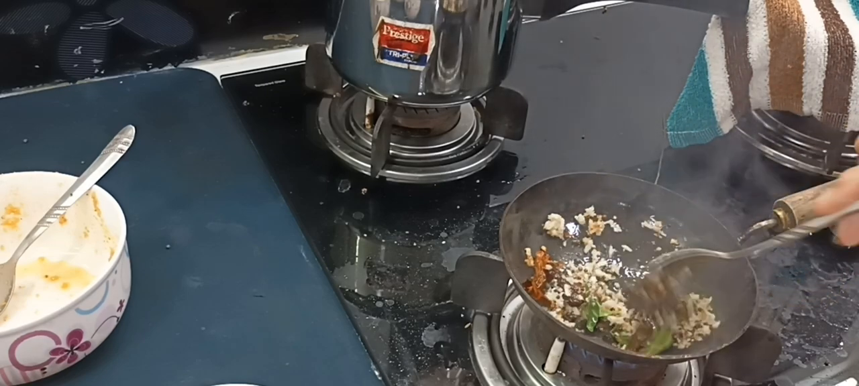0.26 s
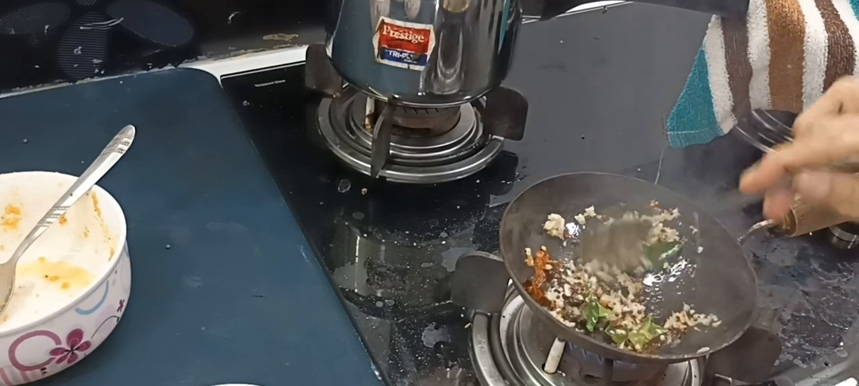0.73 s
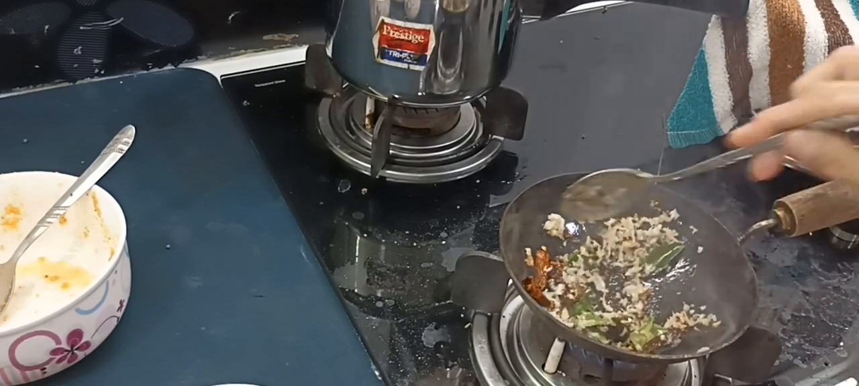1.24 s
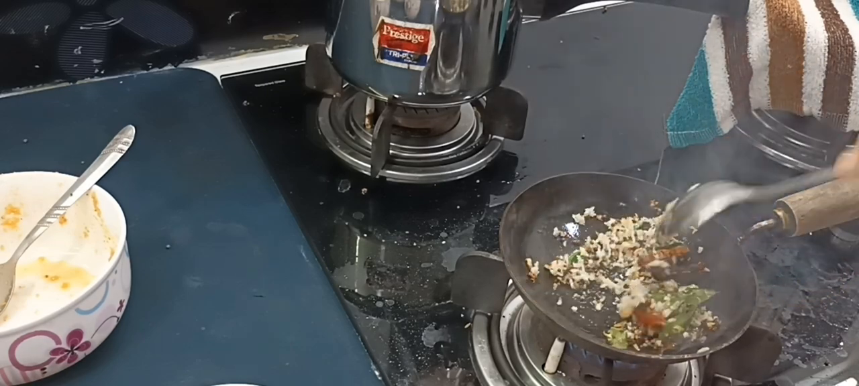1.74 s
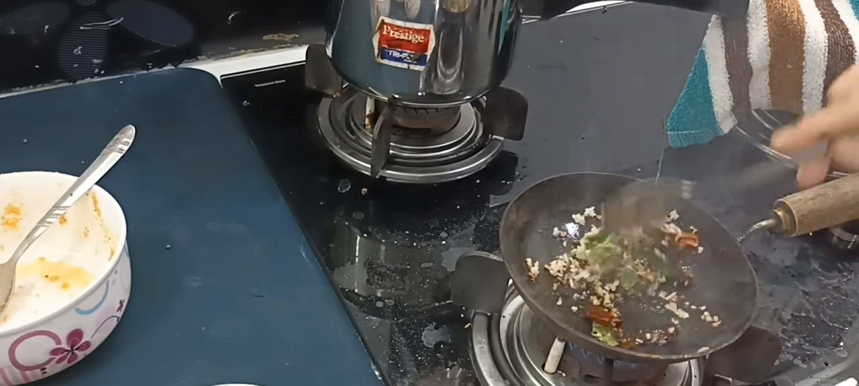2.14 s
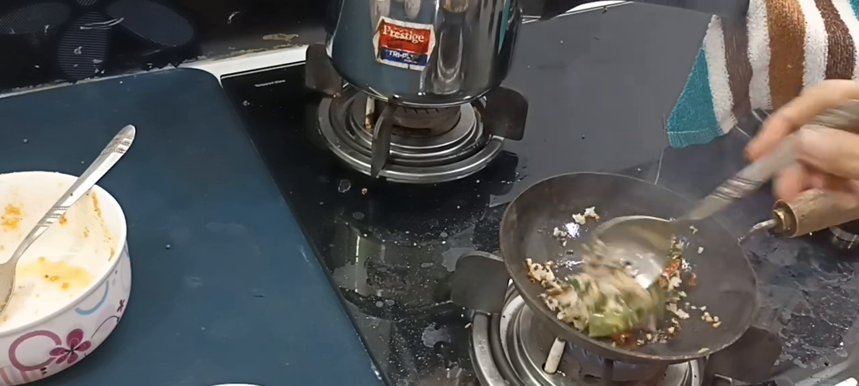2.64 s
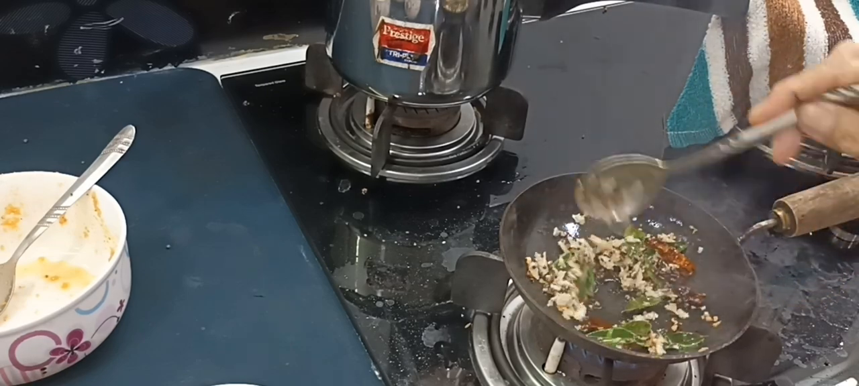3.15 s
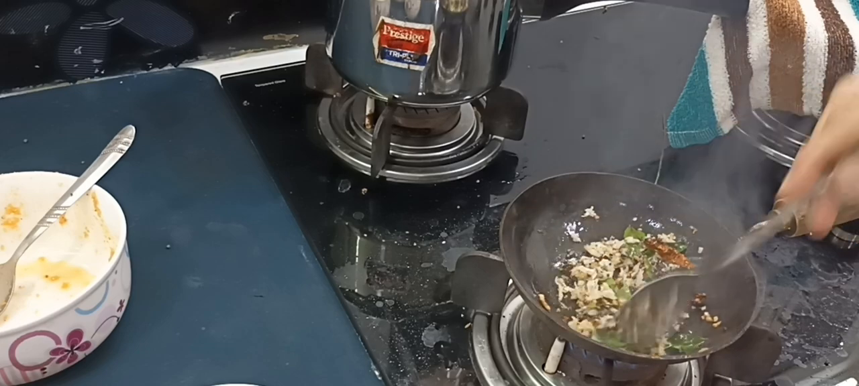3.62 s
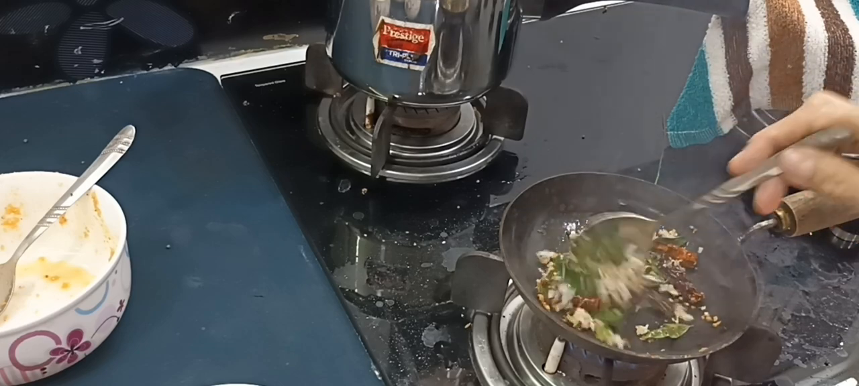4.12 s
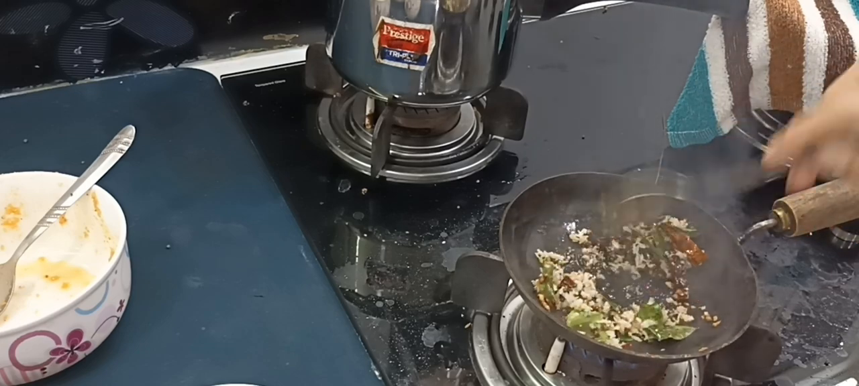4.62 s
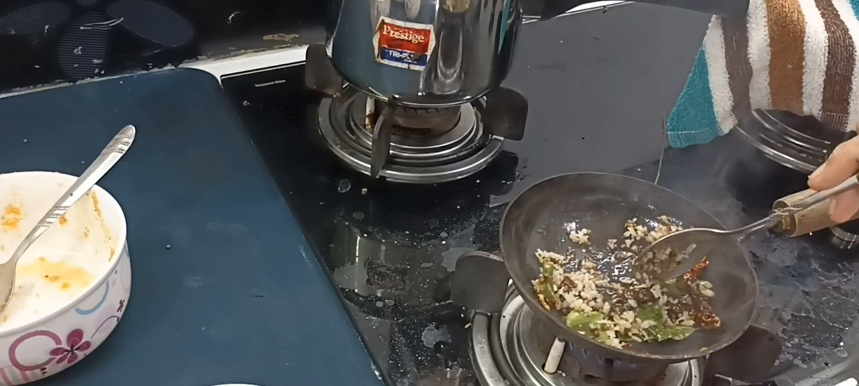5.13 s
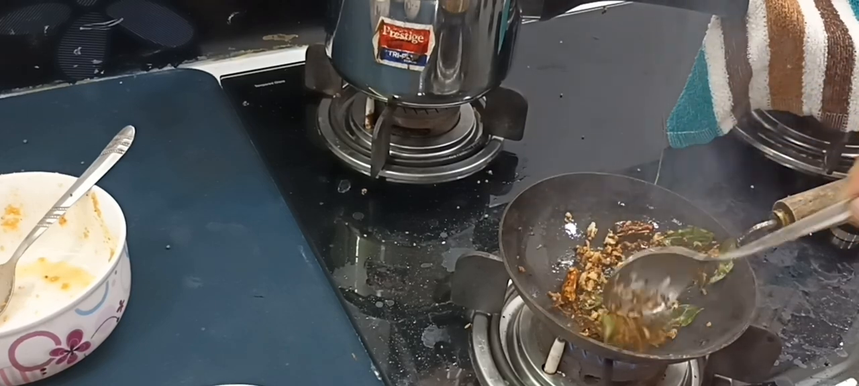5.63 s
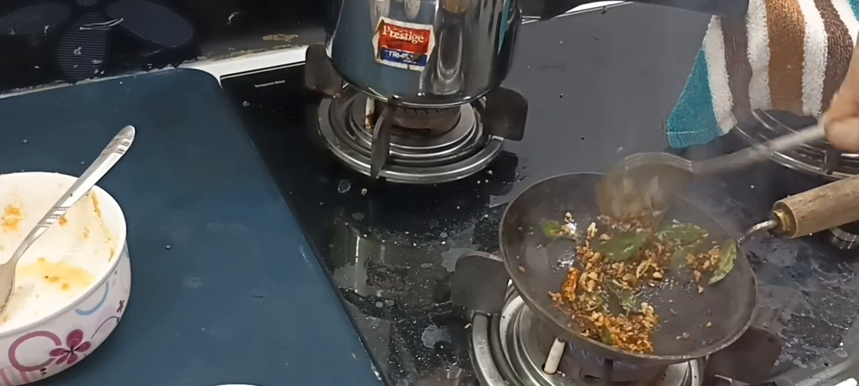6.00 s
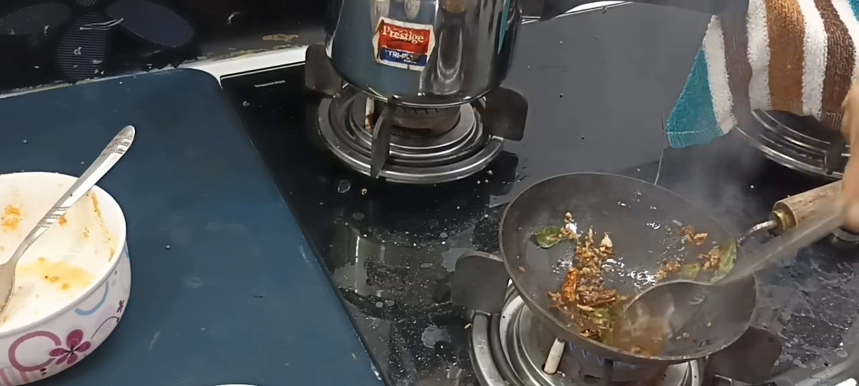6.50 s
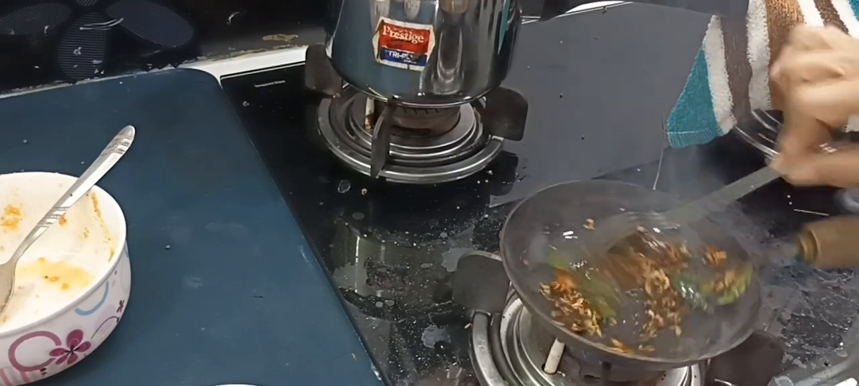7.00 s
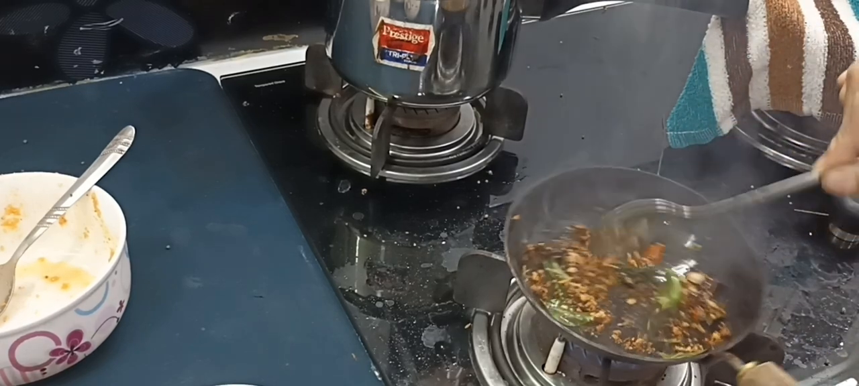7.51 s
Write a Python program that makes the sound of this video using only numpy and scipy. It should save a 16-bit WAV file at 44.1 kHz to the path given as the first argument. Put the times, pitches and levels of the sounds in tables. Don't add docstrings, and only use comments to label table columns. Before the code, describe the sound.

A phone close to the stove picks up bright, brittle popping and fine treble sizzle over a faint low room hum. A ringing spoon tap comes at the start, with more clinks mid-way and short gritty scrapes. Low wobbling thuds of the pan grow busier. Heavy pops flare into hiss and briefly duck the background; near the end the iron pan is dragged, grinding and shuddering, and the spoon strikes loudly. Pops sit mostly left.

```python
import sys
import numpy as np
from scipy import signal
from scipy.fft import rfft, irfft
from scipy.io import wavfile
from scipy.ndimage import uniform_filter1d

SR = 44100
rng = np.random.default_rng(int(sys.argv[2]) if len(sys.argv) > 2 else 0)


def generate_wav(sig):
    pcm = np.round(np.clip(np.atleast_2d(sig).T, -1, 1) * 32767).astype(np.int16)
    wavfile.write(sys.argv[1], SR, pcm)


def magnitude_from_level(level_db):
    exponent = np.asarray(level_db, float) / 20
    return 10 ** exponent


N = 341951

PAN_HZ = [290, 378, 458, 560, 640, 974, 1190, 1324, 1394, 1653, 2044, 2500, 3050, 3430, 4430]
# level_db, t60_s
PAN_MODES = [(-41, 0.092), (4.5, 0.27), (11.5, 0.14), (-7, 0.009), (1, 0.16), (-14, 0.21), (2.5, 0.11),
             (-1.5, 0.07), (1.5, 0.046), (2.5, 0.36), (3, 0.18), (-11.5, 0.45), (-1.5, 0.32), (-9, 0.22),
             (5, 0.0095)]
# start_s, peak_db, pitch_hz, iron_rattle_db (re peak)
ROCKS = [(0.079, -35.5, 145.6, -6.5), (0.145, -42.5, 143.3, -11), (0.43, -48.5, 142, -13),
         (0.69, -46.5, 144, -19), (0.924, -49, 134.3, 1), (3.44, -49, 139, -17), (3.51, -47.5, 143.4, -9),
         (4.67, -44, 136.4, -16), (0.346, -43.5, 146, -17), (0.648, -43.5, 141.4, -18),
         (1.06, -40, 145.6, -8), (1.264, -44, 133, -1.5), (1.431, -45, 137, 6), (1.885, -33, 141.7, -5.5),
         (1.996, -42.5, 140.3, -17), (2.25, -33.5, 138.3, -10.5), (2.993, -35.5, 145.3, -9),
         (3.237, -29.5, 140.8, -13), (3.6, -34.5, 146.3, -8), (3.675, -35, 141, -22),
         (3.929, -36, 138, 0.5), (4.357, -31, 143, -11), (4.59, -37.5, 141.4, -5), (5.554, -44, 148, -11),
         (5.728, -31.5, 147.4, -13), (6.057, -40, 168, -4), (6.488, -45, 145, -9.5),
         (6.623, -40.5, 146, -13), (6.91, -31.5, 147, -44), (7.111, -28.5, 144.6, -10),
         (7.248, -31.5, 157.6, -22), (7.363, -32, 139.5, -34), (7.484, -30, 145, -21),
         (7.585, -25, 147, -13), (7.676, -32.5, 141, -4.5)]
# frequency_hz, density_db
OIL = [(300, -21), (1500, -11.5), (3000, -3), (6000, 10.5), (7800, 8.5), (8900, 10.5), (11300, 10.5),
       (12300, 9.5), (14000, 8), (16500, 1)]
# frequency_hz, density_db
FIZZ = [(400, -30), (1200, -11), (2500, 0), (5500, 0), (7500, -12), (12000, -30)]
# frequency_hz, density_db
IRON = [(70, -29.5), (120, -2.5), (250, -5.5), (600, -0.5), (1500, -11.5), (4700, -11), (6500, -49.5)]


def curve(table):
    s, *columns = np.transpose(table)
    return [np.interp(np.arange(N) / SR, s, column) for column in columns]


def unit(x):
    return x / np.sqrt(np.mean(x ** 2))


def colour(x, points):
    hz, db = np.transpose(points)
    grid_hz = np.linspace(1, SR / 2, 2049)
    gain_db = np.interp(np.log(grid_hz), np.log(hz), db)
    cepstrum = irfft(np.log(magnitude_from_level(gain_db)))
    cepstrum[1:2048] *= 2
    cepstrum[2049:] = 0
    h = irfft(np.exp(rfft(cepstrum)))[None, :2048]
    return signal.oaconvolve(x, h / np.sqrt(np.sum(h ** 2)), axes=1)[:, :N]


def ring(x, hz, t60):
    r = np.exp(-np.log(1000) / t60 / SR)
    return signal.lfilter([.5, 0, -.5], [1, -2 * r * np.cos(2 * np.pi * hz / SR), r * r], x)


def noise(shared):
    share = np.clip(shared, 0, 1)
    common, own = rng.standard_normal(N), rng.standard_normal((2, N))
    return np.sqrt(share) * common + np.sqrt(1 - share) * own


def walk(rate):
    hold = int(SR / rate)
    levels = rng.standard_normal(N // hold + 1)
    return uniform_filter1d(np.repeat(levels, hold), hold)[:N]


def add(out, s, sound):
    i = int(s * SR)
    out[..., i:i + sound.shape[-1]] += sound[..., :N - i]


def low_pass(x, hz):
    return signal.sosfilt(signal.ellip(10, .3, 60, hz, fs=SR, output="sos"), x)


def kitchen(level_db=-52.5):
    # frequency_hz, density_db
    room_spectrum = [(15, -26), (25, -3.5), (126, 4), (188, 0), (314, 1.5), (575, -18.5), (2000, -18),
                     (2600, -71), (4400, -120)]
    return magnitude_from_level(level_db) * unit(colour(noise(0.68), room_spectrum))


def sizzle(wake_db, grain_db=4, sparse=.05, grain_share_db=-4):
    # start_s, sizzle_db, fizz_db (re sizzle)
    simmer = [(0.0, -30.5, -12), (0.32, -33.5, -8), (1.21, -40, -8.5), (1.6, -42, -4), (2.46, -36, -13.5),
              (2.72, -41, -9.5), (3.15, -43.5, -9.5), (3.37, -43, -15), (3.65, -45.5, -8.5),
              (4.42, -37, -11.5), (5.14, -43.5, -11.5), (5.37, -43, -5), (5.63, -48, -9.5), (6.0, -49, 7),
              (6.3, -30, -9), (6.6, -42, -10.5), (7.1, -35.5, -34), (7.75, -51, -13)]
    level_db, fizz_db = curve(simmer)
    size_db = grain_db * np.minimum(rng.exponential(size=N), 2.2)
    bubbles = (rng.random(N) < sparse) * magnitude_from_level(size_db) * rng.standard_normal(N)
    grains = magnitude_from_level(grain_share_db) * unit(bubbles)
    steam = (noise(.15) + grains) * magnitude_from_level(1.8 * walk(150) + 1.3 * walk(25))
    fizz = (noise(0.023) + grains) * magnitude_from_level(fizz_db + 1.5 * walk(40) + 2.4 * walk(25))
    return magnitude_from_level(level_db + wake_db - 10.0) * (colour(steam, OIL) + colour(fizz, FIZZ))


def pan(modes_db=-1.0, knock_s=0.042, stand_db=7.0, muffle_db=1.0, bright_db=-5, stir_level_db=-56.5):
    # start_s, grind_db
    drag = [
        (6.72, -90),
        (6.735, -36.5),
        (6.808, -46),
        (6.818, -32),
        (6.9, -37),
        (7.13, -28.5),
        (7.4, -30),
        (7.55, -32),
        (7.75, -43),
    ]
    jolts, t = np.zeros(N), np.arange(SR // 4) / SR
    for s, db, _, knock_db in ROCKS:
        add(jolts, s, magnitude_from_level(db + knock_db) * np.exp(-t / knock_s))

    time = np.arange(N) / SR
    dragged = np.arange(N) > drag[0][0] * SR
    grind_db, = curve(drag)
    stir_db = stir_level_db + 1.5 * walk(7)
    force = np.where(dragged, magnitude_from_level(grind_db), magnitude_from_level(stir_db)) + magnitude_from_level(bright_db) * jolts
    rub = noise(0.41) * magnitude_from_level(1.2 * walk(45) + 3 * walk(350))

    modes = unit(sum(magnitude_from_level(g + 3.6 * walk(16)) * ring(rub, hz, 0.65 * t60) / np.sqrt(t60)
                     for hz, (g, t60) in zip(PAN_HZ, PAN_MODES)))
    shudder_db = grind_db - 1.5 - 15 * np.exp(-((time - 7.26) / 0.12) ** 2)
    shudder = dragged * magnitude_from_level(shudder_db) * unit(ring(noise(0.98), 156.2, 0.22))
    near = noise(1.0) * magnitude_from_level(3.1 * walk(28))
    stand_modes = ring(near, 247, 0.027) + ring(near, 357, 0.061) + ring(near, 462, 0.065)
    stand = magnitude_from_level(stand_db) * jolts * unit(stand_modes)
    iron = magnitude_from_level(modes_db - muffle_db * ~dragged) * modes + unit(colour(rub, IRON))
    return force * iron + shudder + stand


def spoon(steel_db=-14, iron_db=-8, chatter_db=4.5, rasp=1.55, held_s=0.017):
    # start_s, peak_db, contact_s, ring_share (of full t60), iron_knock_db (re peak)
    touches = [(0.0, -45, 0.011, .3, 4.5), (0.07, -11.5, 0.0012, 0.32, -17), (0.329, -31, 0.011, .05, -13),
               (0.372, -28.5, 0.0036, 0.1, 0), (0.914, -32.5, 0.0031, 0.11, 5.5),
               (1.398, -29.5, 0.024, 0.37, 0), (2.937, -19.5, 0.0052, 0.33, -6.5),
               (3.224, -17, 0.0074, 0.58, -9.5), (3.911, -17.5, 0.021, 0.8, -14),
               (6.057, -35.5, 0.0067, 0.66, 3.5), (6.325, -35, 0.0014, 0.067, -5),
               (6.731, -29.5, 0.013, 0.14, -5), (7.255, -41.5, 0.013, 0.18, 18),
               (7.279, -17, 0.0029, 0.32, -5.5), (7.352, -38, 0.0081, 0.14, 11),
               (7.495, -31, 0.0069, 0.23, 3.5), (7.577, -37, 0.0018, 0.13, 19),
               (7.67, -12, 0.011, 0.38, -12.5)]
    steel_hz = [5110, 5690, 6445, 7820, 8310, 8850, 9400, 10090, 10740, 11800, 13800, 15100]
    # level_db, t60_s
    steel_modes = [(-31, 0.23), (5, 0.052), (8.5, 0.11), (-24, .2), (9.5, 0.035), (-5, 0.16), (-24, 0.21),
                   (7, 0.22), (-1, 0.22), (5, .2), (-9, 0.087), (-14, 0.088)]
    out, t = np.zeros((2, N)), np.arange(SR // 6) / SR
    for s, db, contact, share, knock_db in touches:
        chance = rng.standard_normal((5, len(t)))
        slips = magnitude_from_level(chatter_db * np.clip(np.repeat(chance[1], 50)[:len(t)], -2, 2))
        press = np.exp(-(t / contact) ** 2) * np.minimum(1, t / (0.26 * contact))
        touch = (chance[0] + 0.52 * chance[3:]) * slips * press
        touch = touch / np.sqrt(np.sum(touch ** 2) / (2 + 2 * contact / 0.015))

        spread = chance[2]
        damping = share / (1 + contact / held_s)
        steel = sum(magnitude_from_level(g + 1.5 * own) * ring(touch, hz * (1 + 0.0029 * off), t60 * damping)
                    for hz, (g, t60), own, off in zip(steel_hz, steel_modes, spread, chance[0][::-1]))
        iron = sum(magnitude_from_level(g / 3 + 2.1 * own) * ring(touch, hz, 0.21 * t60)
                   for hz, (g, t60), own in zip(PAN_HZ, PAN_MODES, spread[::-1]))
        knock = magnitude_from_level(steel_db) * steel + magnitude_from_level(knock_db + iron_db) * iron + rasp * touch
        add(out, s, magnitude_from_level(db) * knock * np.minimum(1, 10 - 60 * t))
    return out


def bowl(pitch_hz=6445, t60=0.43, beat_hz=35):
    # start_s, level_db
    sings = [
        (.071, -28),
        (.372, -23),
        (2.41, -36),
        (2.936, -27.5),
        (3.226, -36),
        (3.915, -34),
    ]
    blows = np.zeros(N)
    for s, db in sings:
        add(blows, s, magnitude_from_level(np.array([db])))
    pair = ring(blows, pitch_hz, t60) + 0.48 * ring(blows, pitch_hz - beat_hz, 0.6 * t60)
    return pair * magnitude_from_level(5 * walk(70) - 3)


def seeds(dry_body_db=-14, wet_body_db=-0.5, tick_body_db=-19, dip_per_wake=0.23):
    # start_s, click_db, body_db (re click), wake_db, gain_dip_db
    bursts = [(0.077, -16.5, -11, 13, 13.5), (0.3094, -14, -56, 12.5, 1.5), (0.396, -12.5, -20, 10.5, 14),
              (0.82, -15, -13, 13, 12.5), (1.2476, -12, -10, 12, 1), (1.3982, -14, -1.5, -0.5, 3.5),
              (1.4791, -15, -3, 8.5, 9), (2.1023, -9, -15, 3, 9.5), (3.2262, -16.5, -3, 4.5, -2),
              (2.9652, -10, -12.5, 4, 0), (3.3137, -10.5, -7, 15, 12), (5.41, -20, -2, 0, -1.5),
              (6.6724, -13, -15, 3, 5.5), (3.538, -18, -8.5, 20, 10), (3.8997, -15.5, -36, 8.5, -4),
              (4.2438, -10.5, 0.5, 22.5, 12), (4.6224, -17, -6.5, 9.5, 12), (4.788, -15.5, -16, 10, 9.5),
              (4.9758, -17.5, -12, 11.5, 0), (5.2747, -8.5, 1.5, 19, 26), (5.3861, -16, 4, 8.5, 5),
              (5.6948, -10.5, -9, 23.5, 14.5), (5.831, -17, 7, 17.5, 11.5), (6.2678, -17, 6, 4, 21.5),
              (6.5793, -12, -8.5, 15, 6), (7.0422, -14, -0.5, 26, 19), (7.2791, -22, 11, 4.5, 2),
              (7.4408, -15.5, -13, 9.5, 9.5)]
    # start_s, click_db, wake_db
    dry_pops = [(0.1665, -22, -5), (0.2323, -21.5, 0), (0.3546, -14.5, -5.5), (0.5404, -11.5, 5),
                (0.6497, -21, 1.5), (0.7297, -23, 0), (0.8581, -18, -2.5), (1.1189, -23.5, 2),
                (1.707, -25, 4), (2.0024, -26, 3.5), (2.08, -22.5, 7), (2.3376, -20.5, 7.5),
                (2.5217, -18.5, -2), (2.5964, -13.5, 4.5), (2.811, -27, 4.5), (2.9035, -17.5, 1.5),
                (3.1128, -21.5, 3.5), (3.6528, -26, 4), (3.9125, -8, 12), (4.5289, -20.5, 3),
                (4.91, -23, 1), (5.5383, -13, 6.5), (6.539, -26, -0.5), (7.4568, -19, 15.5),
                (7.67, -7.5, 12), (7.7068, -36, -5)]
    # start_s, click_db, wake_db
    wet_pops = [(0.1298, -22.5, 2.5), (0.4862, -24, 1), (0.5192, -25, -3), (0.9135, -14.5, 7.5),
                (1.4157, -17, 16), (1.734, -23, 1), (1.7669, -16.5, 9), (1.8557, -26, 1), (1.9182, -32, 0),
                (2.2415, -31.5, -2), (2.4868, -23, 5.5), (2.8743, -28.5, 10), (2.936, -22.5, 5.5),
                (3.273, -26, 1), (5.1018, -25.5, 6.5), (5.228, -17, 6), (6.2817, -21.5, 10.5),
                (6.4577, -26, -0.5)]
    # start_s, click_db
    ticks = [(0.145, -26), (0.6365, -29), (1.2024, -32), (1.585, -26.5), (1.758, -21), (1.79, -26),
             (2.02, -30), (2.046, -27.5), (2.3444, -18.5), (2.3815, -26), (2.4996, -20.5), (3.1724, -30),
             (3.5488, -17.5), (3.8377, -36), (4.0442, -32), (4.119, -32.5), (4.4525, -25), (4.577, -27.5),
             (4.665, -23.5), (4.7097, -31), (5.008, -29.5), (5.172, -30), (6.2238, -33), (6.51, -42),
             (6.661, -35), (6.863, -39)]
    # start_s, click_db
    snaps = [(0.3128, -26), (0.3295, -29), (0.332, -23), (0.339, -26), (0.35, -26), (0.6171, -35),
             (0.676, -31), (0.8501, -38), (0.9533, -32), (1.0137, -31), (1.0366, -31), (1.0506, -31),
             (1.673, -33), (1.679, -32), (1.802, -36), (2.0299, -30), (2.204, -34), (2.2783, -31),
             (2.3028, -36), (2.3252, -35), (2.4893, -25), (2.5512, -28.5), (2.8824, -40), (2.9688, -32),
             (3.2287, -31), (3.2322, -25), (4.424, -36), (4.4683, -27), (4.7487, -32), (4.9867, -19),
             (5.0011, -31), (5.147, -40), (5.399, -25), (6.0897, -37), (6.6364, -37), (7.6766, -29),
             (3.9178, -17), (3.9222, -16), (3.929, -21)]
    rows = list(bursts)
    for kind, body_db in ((dry_pops, dry_body_db), (wet_pops, wet_body_db)):
        rows += [(s, db, body_db, wake_db, dip_per_wake * wake_db) for s, db, wake_db in kind]
    for kind in (ticks, snaps):
        rows += [(s, db, tick_body_db, 0, 0) for s, db in kind]
    return rows


def pops(crack_s=.0001, spatter_s=0.002, spatter_db=-17, click_db=14, body_db=10, ragged=0.4,
         heap_width_db=4, echo_s=.0038, echo_db=-16):
    # start_s, left_minus_right_db
    heap = [
        (0.0, 13),
        (2.0, 11.5),
        (4.1, 16.5),
        (4.22, 10),
        (5.3, 6.5),
        (5.37, 12.5),
        (7.75, 8.5),
    ]
    crack, body, t = np.zeros((2, N)), np.zeros((2, N)), np.arange(1300) / SR
    for s, db, rel_db, *_ in seeds():
        jag = rng.standard_normal((4, len(t)))
        pan_db = np.interp(s, *np.transpose(heap)) + heap_width_db * jag[3, -3]
        snap = ragged * (jag[0] + 2.2 * jag[1:3]) * np.exp(-t / (crack_s * magnitude_from_level(1.0 * jag[3, -2])))
        snap[:, 0] = np.sign(jag[0, 0])
        snap = snap / np.sqrt(np.sum(snap ** 2, axis=1, keepdims=True))
        gusts = magnitude_from_level(0.67 * np.repeat(jag[3], 40)[:len(t)])
        drops = jag[1:3] * gusts * np.exp(-t / (spatter_s * magnitude_from_level(2.0 * jag[3, -1])))
        burst = snap + magnitude_from_level(spatter_db) * drops
        burst = burst * magnitude_from_level(db + (pan_db - 9.5) * np.array([[.5], [-.5]]))
        add(crack, s, burst)
        add(body, s, magnitude_from_level(rel_db) * burst)
    out = magnitude_from_level(click_db) * colour(crack, OIL) + magnitude_from_level(body_db) * colour(body, FIZZ)
    return out + magnitude_from_level(echo_db) * np.roll(out, int(echo_s * SR), axis=1)


def wake_and_dip(rise_s=0.00038, fade_s=0.18, recover_s=0.034, duck_s=0.031,
                 block_s=.02, block_start_s=.0045, look_ahead_s=.008):
    # start_s, dip_db
    ducks = [
        (7.2, 6),
        (1.3845, 1),
    ]
    wake, dip, t = np.zeros(N), np.zeros(N), np.arange(SR) / SR
    for s, _, _, wake_db, dip_db in seeds():
        add(wake, s, wake_db * (1 - np.exp(-t / rise_s)) * np.exp(-t / fade_s))
        ahead = look_ahead_s + (s - look_ahead_s - block_start_s) % block_s
        recovery = np.exp(-np.maximum(t - ahead, 0) / recover_s)
        add(dip, s - ahead, dip_db * np.minimum(t / 0.00052, 1) * recovery)
    for s, db in ducks:
        add(dip, s, db * np.exp(-t / duck_s))
    return wake, magnitude_from_level(-dip)


def rocks(push_s=0.0012, ring_s=0.34, grip=0.16, bounce_s=0.0665, bounce_depth=0.93):
    out, t = np.zeros(N), np.arange(SR // 2) / SR
    for s, db, hz, _ in ROCKS:
        t60 = ring_s * magnitude_from_level(-grip * (db + 30.5))
        swing = np.sin(2 * np.pi * hz * t) + 0.19 * np.sin(2 * np.pi * 2.03 * hz * t)
        period = bounce_s * magnitude_from_level(0.55 * rng.standard_normal())
        swing = swing * (1 - bounce_depth * np.cos(np.pi * (t + 0.017) / period) ** 2)
        add(out, s, magnitude_from_level(db + 9.5) * swing * (1 - np.exp(-t / push_s)) * magnitude_from_level(-60 * t / t60))
    return out


def scrapes(rasp_db=-5, grit_db=2.5, swell=.7):
    # start_s, length_s, level_db, lower_pair_db, iron_grind_db
    drags = [(0.368, 0.016, -25, -4, -14.5), (1.389, 0.031, -35, -6, -2), (2.263, 0.21, -50, 6, 5),
             (2.401, 0.021, -29, -5, -22), (2.934, 0.034, -30, 5, -16.5), (3.239, 0.037, -37, -4, -3),
             (3.273, 0.068, -33.5, 1, -9), (4.577, 0.036, -42, -6, -2), (6.118, 0.11, -29, -3.5, -10),
             (7.274, 0.17, -42.5, 0, 0), (7.682, 0.066, -31, -12, -8), (6.973, 0.013, -43.5, -10, 10.5),
             (7.083, .012, -44, -10, 12), (7.203, 0.013, -43, -10, 13)]
    edge_hz = [5600, 6400, 8270, 8930, 10150, 10700, 11800, 13600, 15000]
    # level_db, t60_s
    edge_modes = [(-14, .01), (-12, .025), (-6, .02), (-5, .018), (-8, .03), (-11, .025), (-2, .022),
                  (-18, .012), (-17, .02)]
    # frequency_hz, density_db
    rasp_spectrum = [(2000, -16), (5000, -1), (8500, 4), (11500, 4), (13000, -9), (16000, -7)]
    out, t = np.zeros((2, N)), np.arange(SR // 4) / SR
    for s, length, db, pair_db, iron_db in drags:
        chance = rng.standard_normal((4, len(t)))
        grit = magnitude_from_level(grit_db * np.repeat(chance[3], 90)[:len(t)])
        grip = np.sin(np.pi * np.clip(t / length, 0, 1)) ** swell * grit
        rub = (chance[0] + 0.3 * chance[1:3]) * grip
        edge = 0
        for hz, (g, t60), own, off in zip(edge_hz, edge_modes, chance[3], chance[3][::-1]):
            mode_db = g + pair_db * (8000 < hz < 9000) + 0.87 * own
            edge = edge + magnitude_from_level(mode_db) * ring(rub, hz * (1 + 0.0088 * off), t60) / np.sqrt(t60 * SR / 30)
        iron = colour(rub, IRON)[:, :len(t)] + sum(ring(rub, hz, 0.048) for hz in PAN_HZ[1:4]) / 12
        rasp = colour(rub, rasp_spectrum)[:, :len(t)]
        add(out, s, magnitude_from_level(db) * (edge + magnitude_from_level(rasp_db) * rasp + magnitude_from_level(iron_db) * iron))
    return out


def slaps(low_hz=30, far_share=1.0):
    # start_s, pressure_step (signed), relax_s, right_port_db
    droplets = [
        (4.2436, 0.56, 0.0076, 2.5),
        (5.275, 0.43, 0.0074, 10),
        (6.2666, 1, 0.015, -14),
        (6.282, 0.029, 0.0061, 27),
        (7.0419, -1.22, 0.007, -7.5),
    ]
    out, t = np.zeros((2, N)), np.arange(SR // 10) / SR
    for s, size, relax, right_db in droplets:
        step = np.exp(-t / (relax * np.array([[1], [far_share]]))) * np.minimum(t / 0.00036, 1)
        add(out, s, size * step * magnitude_from_level(np.array([[0], [right_db]])))
    out = signal.sosfilt(signal.butter(2, low_hz, "high", fs=SR, output="sos"), out)
    return signal.sosfiltfilt(signal.butter(1, 14, "high", fs=SR, output="sos"), out)


def scene():
    wake, dip = wake_and_dip()
    ducked = dip * (kitchen() + sizzle(wake) + pan() + rocks() + scrapes())
    half_ducked = np.sqrt(dip) * (spoon() + bowl())
    return low_pass(ducked + half_ducked, 15700) + pops() + slaps()


def roll_off(x):
    return signal.sosfilt(signal.butter(12, 17020, fs=SR, output="sos"), x)


def record(dry):
    # resonance_hz, width_hz, lift_db, level_db, top_slope_db
    ports = [
        (9850, 1004, 11.5, -2.72, -2.5),
        (10680, 450, 14, -6, 1.5),
    ]
    out = np.zeros_like(dry)
    for k, (hz, width, lift_db, db, top_db) in enumerate(ports):
        peak = signal.lfilter(*signal.iirpeak(hz, hz / width, fs=SR), dry[k])
        lifted = dry[k] + (magnitude_from_level(lift_db) - 1) * peak
        out[k] = magnitude_from_level(db) * colour(lifted[None], [(10500, 0.0041), (13000, top_db)])[0]
    out[0] = np.roll(out[0], 39)
    limited = low_pass(np.clip(out, -.93, .93), 16400)
    return roll_off(np.clip(limited, -1, 1))


dry = scene()
out = record(dry)
generate_wav(out)
```